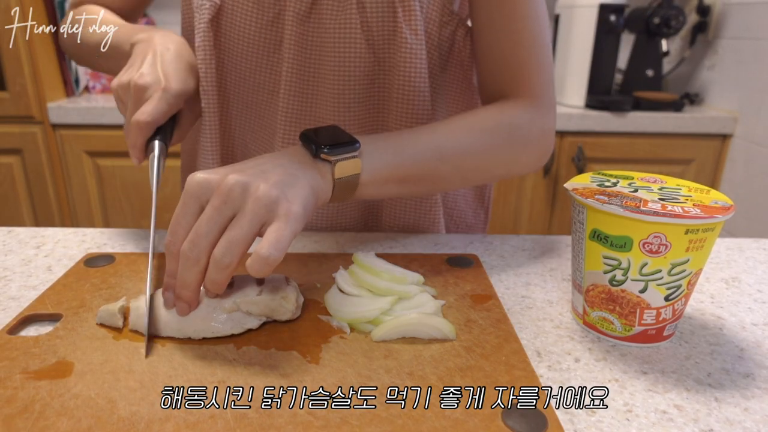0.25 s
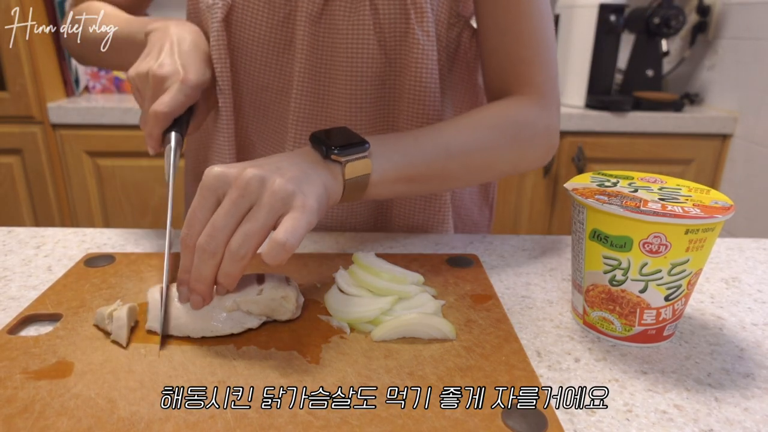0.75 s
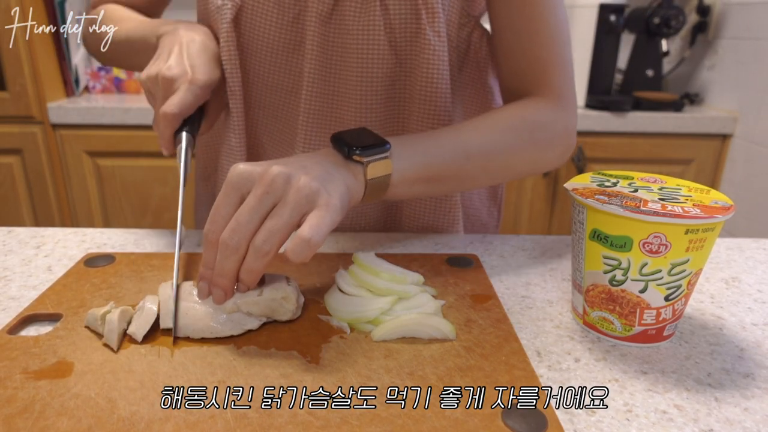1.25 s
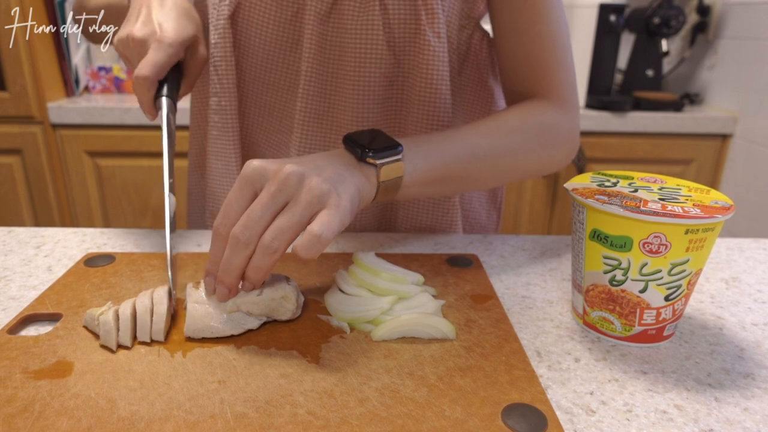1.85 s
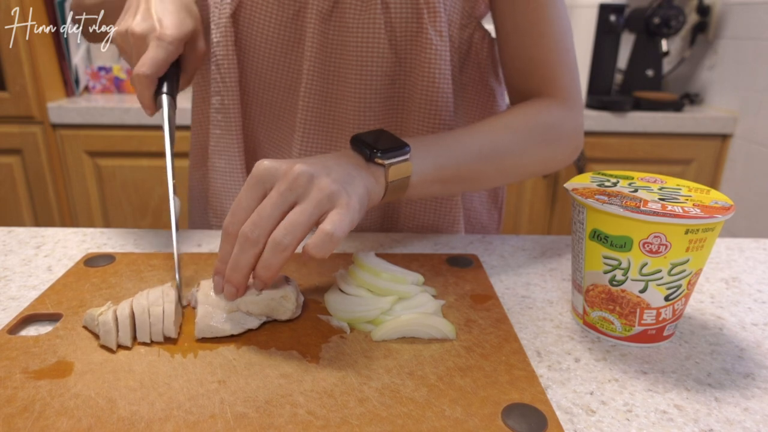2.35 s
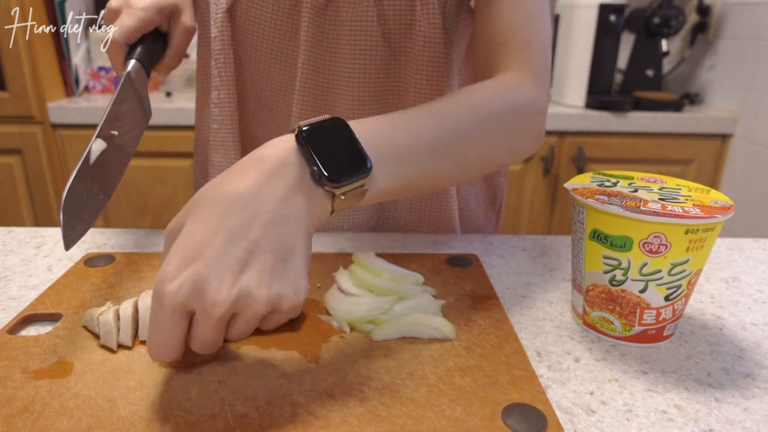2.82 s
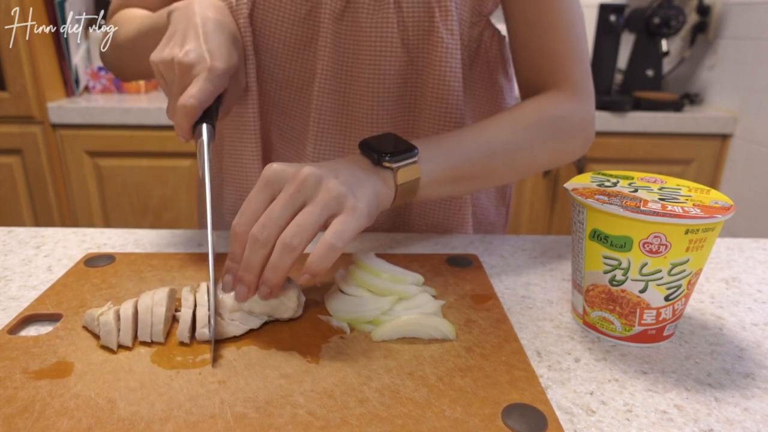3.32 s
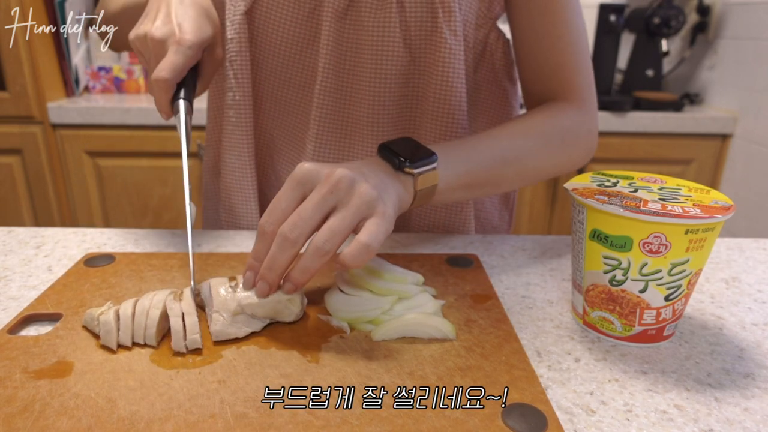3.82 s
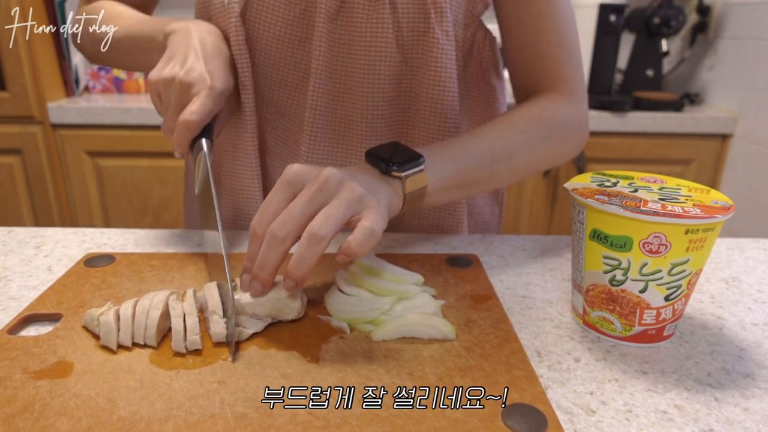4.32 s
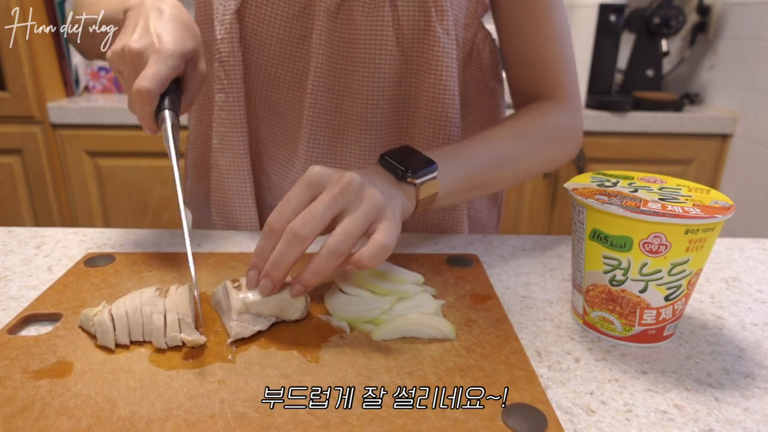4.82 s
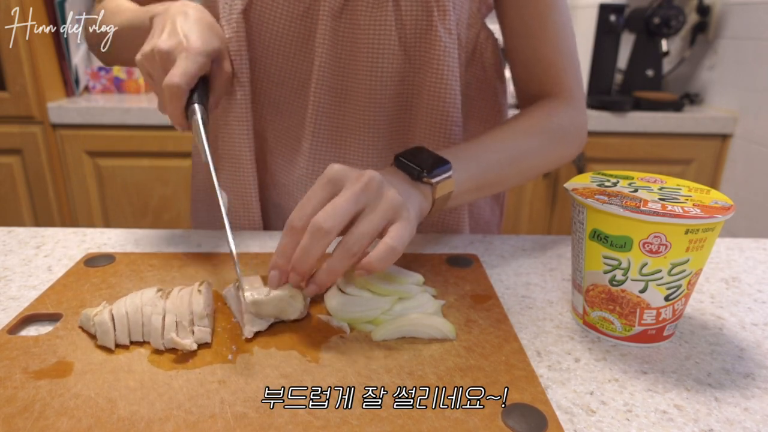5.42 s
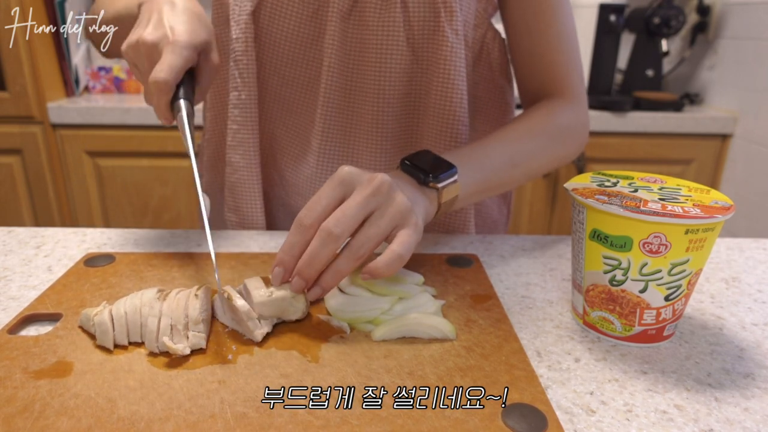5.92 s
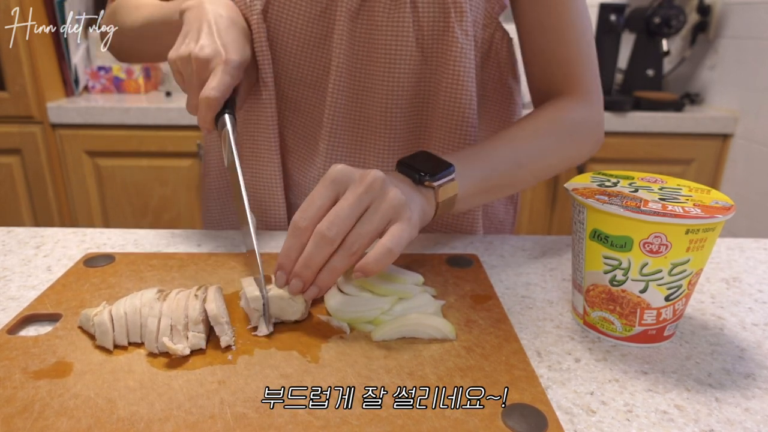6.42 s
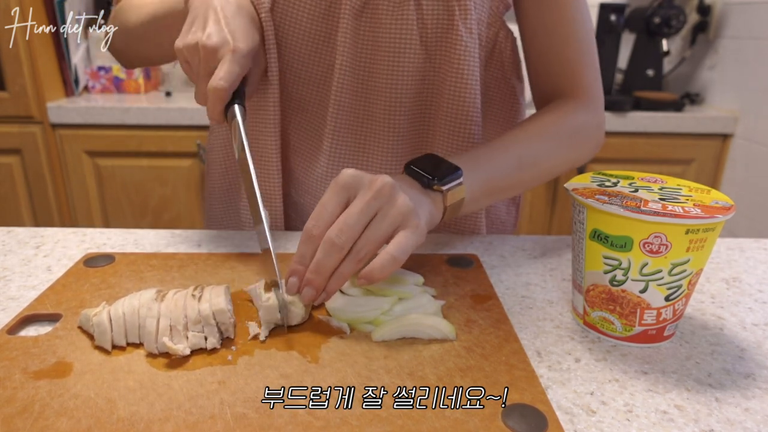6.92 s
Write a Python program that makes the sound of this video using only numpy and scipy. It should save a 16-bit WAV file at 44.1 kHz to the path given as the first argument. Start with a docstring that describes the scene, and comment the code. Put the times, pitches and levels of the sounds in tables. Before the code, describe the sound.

A kitchen knife slices cooked chicken on a board, each soft rubbing cut ending in a crisp tap and short scrape, close up in a quiet kitchen.

```python
"""In a quiet kitchen, a knife slices chicken on a cutting board, close to the microphone.
Tiny impacts make the taps on the board; rubbing noise makes the skids, light glides and pressed rubs.
All of these ring through the same resonances of knife and board, and one faint steel ping joins them.
The worktop and cupboards add a short tail of fading noise.
Behind it lie soft filtered air noise and the faint, wavering tones of appliance fans."""
import sys
import numpy as np
from scipy import signal
from scipy.fft import rfft, irfft
from scipy.io import wavfile
from scipy.ndimage import uniform_filter1d

SR = 44100
rng = np.random.default_rng(int(sys.argv[2]) if len(sys.argv) > 2 else 0)


def log_audio(samples):
    """Write samples as a 16-bit WAV file to the path given in sys.argv[1]."""
    # one column per channel
    frames = np.atleast_2d(samples).T
    # limit to full scale, then quantise
    limited = np.clip(frames, -1, 1)
    pcm = np.round(limited * 32767).astype(np.int16)
    wavfile.write(sys.argv[1], SR, pcm)


N = 315753  # length of the scene in samples


def gain_of(db):
    """Turns decibels into an amplitude factor."""
    return 10 ** (np.asarray(db) / 20)


def evened(x):
    """Scales a signal to an rms (average strength) of 1."""
    return x / np.sqrt(np.mean(x ** 2) + 1e-20)


def read(points, hz):
    """Reads each column of a table at the given frequencies, on a log-frequency axis."""
    table_hz, *columns = np.transpose(points)
    return np.squeeze([np.interp(np.log(hz + 1), np.log(table_hz + 1), c) for c in columns])


def add(mix, start_s, sound):
    """Adds a sound at its start time, cutting off what falls outside the scene."""
    at = round(start_s * SR)
    sound = sound[max(-at, 0):]
    part = mix[max(at, 0):][:len(sound)]
    part += sound[:len(part)]


# Colour of the air noise. Each row: frequency in Hz, relative strength in dB per Hz.
AIR_COLOUR = [(25, -33.5), (60, -26), (90, -28.5), (170, -33.5), (230, -20.5), (300, -16.5), (480, -4.5),
              (760, 2.5), (1200, -4.5), (2300, -6), (3200, -10), (6700, -8.5), (9000, -17), (15500, -23)]
# How alike the air noise is left and right. Each row: frequency in Hz, likeness (1 is identical).
AIR_LIKENESS = [(60, 0.74), (150, 0.79), (300, 0.39), (700, 0.78), (2000, 0.68), (4500, 0.64), (6600, .45),
                (12000, 0.68)]
AIR_DB = -64  # overall rms level


def air():
    """Soft steady noise of the room: coloured random noise, partly alike left and right."""
    hz = np.fft.rfftfreq(N, 1 / SR)
    left, other = rfft(rng.standard_normal((2, N))) * gain_of(read(AIR_COLOUR, hz))
    same = np.clip(read(AIR_LIKENESS, hz), -1, 1)
    right = same * left + np.sqrt(1 - same ** 2) * other
    return gain_of(AIR_DB) * evened(irfft(np.array([left, right]), N))


# Tones of two fans at slightly different speeds; close pairs beat.
# Each row: frequency in Hz, rms level in dB.
FAN_TONES = [(57.3, -108), (63.4, -108), (228.9, -90), (238.3, -99), (457.8, -86.5), (686.7, -72),
             (692.9, -71.5), (750.3, -73), (1429.8, -82), (1582.0, -81), (2060.6, -89)]


def hum(wander_hz=0.06, drift_hz=0.5, waver_db=1.0, waver_hz=2.49, count=64):
    """Fan tones whose pitch drifts a little, the higher ones more, and whose level wavers."""
    t, out = np.arange(N) / SR, np.zeros(N)
    for hz, db in FAN_TONES:
        start_phase, drift_phase = 2 * np.pi * rng.random(2)
        drift_rate = drift_hz * rng.uniform(0.84, 1)
        # wander_hz is the drift of a tone at 700 Hz
        drift = wander_hz * hz / 700 * np.sin(2 * np.pi * drift_rate * t + drift_phase)
        # random levels, waver_hz new ones per second, joined by straight lines
        waver = gain_of(waver_db * np.interp(t * waver_hz, np.arange(count), rng.standard_normal(count)))
        tone = np.sin(start_phase + 2 * np.pi * np.cumsum(hz + drift) / SR)
        out += gain_of(db) * evened(waver * tone)
    return out


# Colour of the contact.
# Each row: frequency in Hz, strength in dB of a light glide, of a pressed scrape, and of a tap.
CONTACT_COLOUR = [(326, -46, -25, -24.5), (690, -16.5, -7.5, -11), (1400, -27, -10, -22.5),
                  (2050, -21, -12.5, -14), (2844, -18, -11.5, -16.5), (3214, -6.5, -5, -8.5),
                  (3833, 5.5, -2, 0.5), (4630, -3, -7, -6), (6030, -9.5, -4.5, -9.5), (6740, -11.5, 0, -2),
                  (7930, -7.5, -6.5, -8.5), (9350, 2.5, -8, -11), (12050, -12, -16, -21),
                  (15500.0, -9, -15, -13)]
# Resonances of knife and board.
# Each row: frequency in Hz, width in Hz, lift in dB with the blade upright, and with it leaning.
KNIFE_MODES = [(716, 176, 2.5, 13.5), (1587, 210, 15.5, 4), (2130, 220, 19, 11.5), (3090, 230, 8.5, 13.5),
               (3508, 296, 16, 11.5), (3890, 195, 13, 12.5), (4277, 87, 4, 1), (4310, 550, 0.5, 8.5),
               (4800, 370, 1.5, 9), (5500, 770, 7, -2), (6270, 79, -4, 10), (6437, 320, 10, 11),
               (6660, 260, -2, 9), (7550, 590, 9, -1.5), (8806, 187, 9.5, 9), (9265, 250, 10.5, 8),
               (9700, 320, 4.5, 0), (10070, 310, -4, 6), (10680, 470, 9, 6.5), (11520, 280, 9.5, 9.5),
               (12940, 320, 6.5, 2), (13150, 920, 0, 8), (15200, 510.0, -2, 2.5)]
# The blade mostly leans further as the cuts move along the meat.
# Each row: time in seconds, lean from 0 (upright) to 1 (leaning).
BLADE_LEAN = [(0, 0), (2.4, 0.36), (3.6, 0.44), (4.3, 0.57), (5.3, 0.8), (5.7, 0.77), (6.2, 0.97),
              (7.1, 0.77)]


def ring(at_s, shares, tilt_db, size=4096):
    """How knife and board answer a blend of glide, scrape and tap: a causal response of energy 1."""
    hz = np.fft.rfftfreq(size, 1 / SR)
    tilt = tilt_db * np.log2(np.maximum(hz, 2400) / 5000)  # dB per octave, above 2400 Hz only
    db = np.dot(shares, read(CONTACT_COLOUR, hz)) + tilt
    lean = np.clip(np.interp(at_s, *np.transpose(BLADE_LEAN)), 0, 1)
    for centre, width, upright_db, leaning_db in KNIFE_MODES:
        lift_db = (1 - lean) * upright_db + lean * leaning_db
        db = db + lift_db / (1 + (2 * (hz - centre) / width) ** 2)
    # each contact meets another point of the edge, which reshuffles the high resonances
    ripple = uniform_filter1d(rng.standard_normal(len(hz)), size=30)
    ripple = evened(uniform_filter1d(ripple, size=24))
    db = db + ripple * np.interp(hz, [3500, 7000], [1.0, 2.0])
    db = db - 20 * np.log10(1 + (330 / (hz + 50)) ** 4)  # a thin blade radiates almost no bass
    # minimum phase: the response starts at once, with nothing before the contact
    log_gain = np.log(gain_of(np.r_[db, db[-2:0:-1]]))
    response = np.fft.ifft(np.exp(np.conj(signal.hilbert(log_gain)))).real[:size // 2]
    return response / np.linalg.norm(response)


def swell(peak_s, rise, fall):
    """One rounded rise and fall: gives its start in seconds and its envelope."""
    since_peak = np.arange(-3 * rise, 3 * fall, 1 / SR)
    return peak_s + since_peak[0], np.exp(-(since_peak / np.where(since_peak < 0, rise, fall)) ** 2)


def sawing(length, swells, stick, slope_db, roundness=1.38):
    """Envelope of a push that slows and frees itself in equal swells."""
    u = np.linspace(0, 1, round(length * SR))
    speed = stick + (1 - stick) * abs(np.sin(np.pi * round(swells) * u)) ** roundness
    return speed * gain_of(slope_db * (u - .5))


# Pressed rubs of the edge along the board:
# mostly final drags that free a slice, and one skid's second swell.
# Each row: peak time in seconds, rise in seconds, fall in seconds, level in dB,
# pressure from 0 to 1, tilt in dB per octave.
PRESSED_RUBS = [(-0.012, 0.025, 0.021, -33, 0.6, 1), (0.445, 0.019, 0.015, -38, 0.63, 2.5),
                (0.936, 0.021, 0.013, -33.5, 0.65, 3.5), (1.377, 0.0049, 0.021, -35, 0.48, 0.5),
                (1.848, 0.0065, 0.017, -37.5, 0.63, 3.5), (2.416, 0.011, 0.016, -34, 0.48, -1),
                (3.376, 0.016, 0.029, -45.5, 1, 3), (3.594, 0.017, 0.012, -37.5, 0.71, 1.2),
                (3.866, 0.02, 0.028, -41, 0.6, 2.5), (4.525, 0.013, 0.0073, -32.5, 0.26, 0),
                (5.36, 0.016, 0.018, -33, 0.49, 1), (5.862, 0.0074, 0.0045, -27.5, 0.68, 5),
                (6.212, 0.018, 0.0067, -35, 0.68, 0), (6.676, 0.0067, 0.0073, -38.5, 0.93, 2.5),
                (6.716, 0.04, 0.0051, -35.5, 0.58, 0.5)]


def pressed_rubs():
    """Rubs along the board: single swells of friction, each with its own pressure."""
    for peak_s, rise, fall, db, pressure, tilt_db in PRESSED_RUBS:
        yield *swell(peak_s, rise, fall), db, pressure, tilt_db


# The blade glides lightly through the meat.
# Each row: start in seconds, length in seconds, level in dB, tilt in dB per octave, number of swells.
MEAT_GLIDES = [(0.031, 0.042, -53, 4, 1), (0.334, 0.022, -41.5, 5, 1), (0.362, 0.039, -37.5, 3, 1),
               (0.768, 0.1, -41, 2, 1), (0.88, 0.037, -42, 2, 1), (1.269, 0.091, -41, 1, 1),
               (1.71, 0.036, -50, 1.5, 2), (1.744, 0.084, -48, 1.5, 1), (2.18, 0.1, -43.5, 1, 1),
               (2.295, 0.019, -53.5, 0, 1), (3.431, 0.038, -43.5, 2.5, 1), (3.476, 0.065, -45.5, -1.5, 2),
               (4.389, 0.1, -41.5, 1, 2), (5.191, 0.051, -44, 1, 1), (5.249, 0.079, -37, 0.5, 1),
               (5.777, 0.022, -38.5, 0.5, 1), (5.802, 0.046, -41.5, -1, 1), (6.142, 0.056, -51, -1.5, 2),
               (6.52, 0.13, -41.5, 1, 5), (7.078, 0.077, -37, 0.7, 1)]
# a glide keeps an even level apart from its swells; "stick" is the share left between two swells
GLIDE_PRESSURE, GLIDE_STICK, GLIDE_SLOPE_DB = 0.24, 0.079, 0


def glides():
    """Glides through the meat: light rubbing that nearly sticks between swells."""
    for s, length, db, tilt_db, swells in MEAT_GLIDES:
        envelope = sawing(length, swells, GLIDE_STICK, GLIDE_SLOPE_DB)
        yield s, envelope, db, GLIDE_PRESSURE, tilt_db


# The edge lands on the board and skids on under pressure.
# Each row: start in seconds, tap energy in dB before a common trim, tap tilt in dB per octave,
# skid length in seconds, skid level in dB, number of swells in the skid.
BOARD_TAPS = [(0.2724, -5, 4.5, 0.06, -38.5, 1), (0.4153, -19.8, 2, 0.013, -54, 1),
              (0.7373, -10, 1, 0.03, -45.5, 1), (1.232, -22, 3.5, 0.04, -40, 1),
              (1.665, -14, 0, 0.04, -43, 1), (2.1443, -15, -1, 0.036, -42, 1),
              (2.3963, -4, 0.5, 0.0083, -40, 1), (3.3278, -7.5, 3, 0.021, -38.5, 1),
              (3.8256, -19, 0, 0.022, -51.5, 1), (4.2324, -4.5, 3.3, 0.05, -41, 2),
              (4.306, -18.5, 1.5, 0.034, -39.5, 1), (5.155, -23.5, 1, 0.031, -39.5, 1),
              (5.612, -7.5, 0.5, 0.055, -58, 1), (5.674, -10, -1.5, 0.056, -49.5, 2),
              (5.7497, -9.5, 1, 0.033, -53, 1), (5.7953, -15.5, 1, 0.0088, -60, 1),
              (5.845, -10, 3.5, 0.013, -35.5, 1), (6.0693, -9, -2, 0.077, -49.5, 1),
              (6.4839, -7, 0.5, 0.078, -46.5, 2), (6.9752, -3, 3.5, 0.052, -48.5, 1),
              (7.0396, -7, -2, 0.037, -55, 1)]
# after a pause the blade first enters the meat, with a faint bright hiss ahead of the tap
PAUSE_S = 0.3
ENTRY_LEAD_S, ENTRY_RISE_S, ENTRY_FALL_S = 0.072, 0.013, 0.028
ENTRY_DB, ENTRY_TILT_DB, ENTRY_PRESSURE = -68, 9, 0.7
# a skid loses speed along its length and takes a share of the tap's brightness
SKID_PRESSURE, SKID_STICK, SKID_SLOPE_DB = 0.91, 0.11, -2.5
SKID_TILT_DB, SKID_TILT_SHARE = 2, 0.73


def entries_and_skids():
    """A faint hiss into the meat after each pause, and a pressed, fading skid from each tap."""
    last_tap = -np.inf
    for s, _, tap_tilt_db, length, db, swells in BOARD_TAPS:
        if s - last_tap > PAUSE_S:
            entry = swell(s - ENTRY_LEAD_S, ENTRY_RISE_S, ENTRY_FALL_S)
            yield *entry, ENTRY_DB, ENTRY_PRESSURE, ENTRY_TILT_DB
        envelope = sawing(length, swells, SKID_STICK, SKID_SLOPE_DB)
        yield s, envelope, db, SKID_PRESSURE, SKID_TILT_DB + SKID_TILT_SHARE * tap_tilt_db
        last_tap = s


def strokes(level_db=0, slips_per_s=4000, slip_spread_db=3, grit=0.26, catch_db=1.1, catch_hz=180):
    """Smooth friction and tiny slips of the edge swell and fade; pressure fills out the mids."""
    slips = (rng.random(N) < slips_per_s / SR) * rng.choice([-1, 1], N)
    slips = evened(slips * gain_of(slip_spread_db * np.minimum(rng.exponential(1, N), 4)))
    grit = np.clip(grit, 0, 1)  # share of the slips in the power
    friction = np.sqrt(grit) * slips + np.sqrt(1 - grit) * rng.standard_normal(N)
    # the edge catches on fibres and lets go: a slow random change of level
    slow = signal.butter(2, catch_hz, fs=SR, output="sos")
    catch = evened(signal.sosfilt(slow, rng.standard_normal(N)))
    friction = evened(friction * gain_of(catch_db * catch))
    out = np.zeros(N)
    for s, envelope, db, pressure, tilt_db in [*pressed_rubs(), *glides(), *entries_and_skids()]:
        rub = envelope * friction.take(round(s * SR) + np.arange(len(envelope)), mode="wrap")
        pressure = np.clip(pressure, 0, 1)
        scrape = signal.fftconvolve(rub, ring(s, [1 - pressure, pressure, 0], tilt_db))
        scrape *= np.linalg.norm(envelope) / np.linalg.norm(scrape)
        add(out, s, gain_of(db + level_db) * scrape)
    return out


def taps(level_db=-2.3, contact_s=0.00031, soft_hz=11500,
         bounce_s=.0028, bounce=0.36, second_bounce=0.24, size=256):
    """Each touch is a short cluster of tiny impacts, and comes back twice from nearby surfaces."""
    out, t = np.zeros(N), np.arange(size) / SR
    burst = (t / contact_s) ** 2 * np.exp(-2 * t / contact_s)  # strongest at contact_s
    clusters = rfft(rng.standard_normal((len(BOARD_TAPS), size)) * burst)
    cushion = 1 / np.sqrt(1 + (np.fft.rfftfreq(size, 1 / SR) / soft_hz) ** 4)  # wet meat softens the blow
    # the power weakens strong frequencies and lifts weak ones, keeping their phases
    clusters = irfft(cushion * clusters / abs(clusters) ** 1.53)[:, :size // 2]
    for (s, db, tilt_db, *_), cluster in zip(BOARD_TAPS, clusters):
        tick = np.convolve(cluster, ring(s, [0, 0, 1], tilt_db))
        tick *= gain_of(db + level_db) / np.linalg.norm(tick)
        first, second = bounce_s * (np.arange(1, 3) + rng.uniform(-0.13, .1, 2))
        add(out, s, tick)
        add(out, s + first, bounce * tick)
        add(out, s + second, second_bounce * tick)
    return out


# A faint ping as the knife is lifted.
# One row: frequency in Hz, peak level in dB, time to fade by 60 dB in seconds.
STEEL_PING = (6560, -48.5, 0.024)
PING_AT_S = 2.7004


def ping():
    """One quickly dying partial of the steel: a fading sine."""
    hz, db, t60 = STEEL_PING
    t, out = np.arange(SR // 10) / SR, np.zeros(N)
    fade = np.exp(-np.log(1000) * t / t60)
    add(out, PING_AT_S, gain_of(db) * fade * np.sin(2 * np.pi * hz * t))
    return out


# Reverberation of the kitchen. Each row: frequency in Hz, time to fade by 60 dB in seconds.
KITCHEN_FADE = [(600, 0.39), (1600, 0.31), (3500, 0.12), (8000, 0.12), (14000, 0.099)]


def kitchen(x, middle_db, side_db, gap_s):
    """A short diffuse tail of fading noise, mostly shared by the two close microphones."""
    hz, t, noise = signal.stft(rng.standard_normal((2, SR // 3)), SR, nperseg=256)
    fade = np.exp(-np.log(1000) * t / read(KITCHEN_FADE, hz)[:, None])
    tails = signal.istft(noise * fade, SR, nperseg=256)[1]
    # silent for gap_s, then fading in over the same time
    tails *= np.clip(np.arange(tails.shape[1]) / SR / gap_s - 1, 0, 1)
    tails /= np.linalg.norm(tails, axis=1, keepdims=True)
    middle, side = signal.fftconvolve(x[None], tails, axes=1)[:, :N]
    return gain_of(middle_db) * middle + gain_of(side_db) * np.array([side, -side])


def scene(direct_db=-0.2, middle_db=-7.5, side_db=-18, gap_s=0.00097):
    """The knife in the middle, the kitchen around it, air and fans behind."""
    knife = strokes() + taps() + ping()
    return gain_of(direct_db) * knife + kitchen(knife, middle_db, side_db, gap_s) + air() + hum()


EDGE_HZ = 16000  # top of the recorder's band


def record(dry):
    """The recorder's band limit: a low-pass filter."""
    low_pass = signal.firwin(511, EDGE_HZ, window=("kaiser", 9), fs=SR)
    return signal.oaconvolve(dry, low_pass[None], "same")


dry = scene()
out = record(dry)
log_audio(out)
```